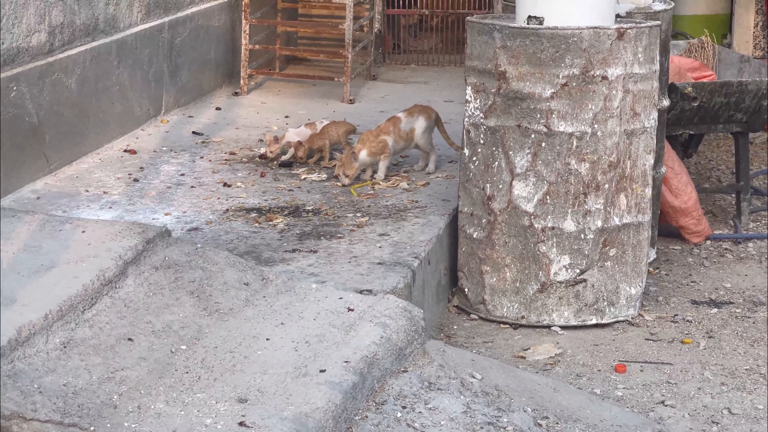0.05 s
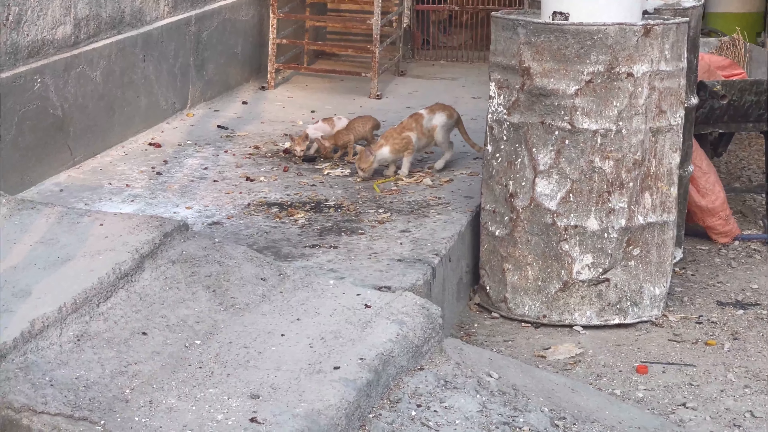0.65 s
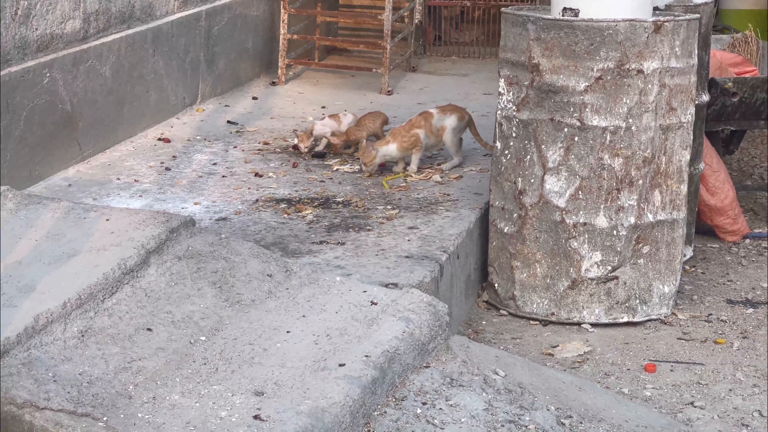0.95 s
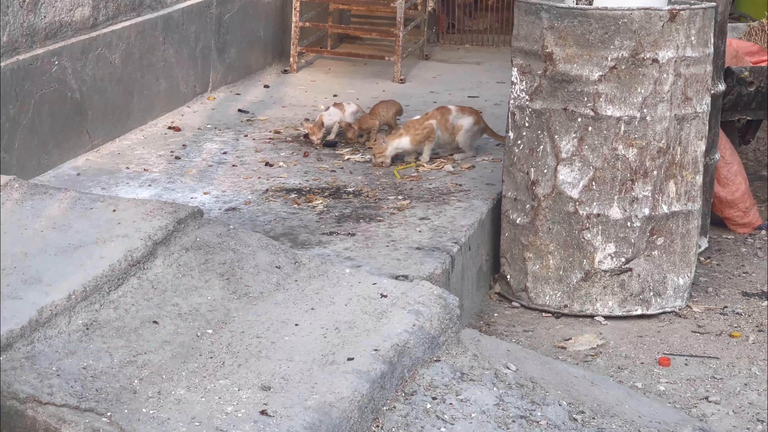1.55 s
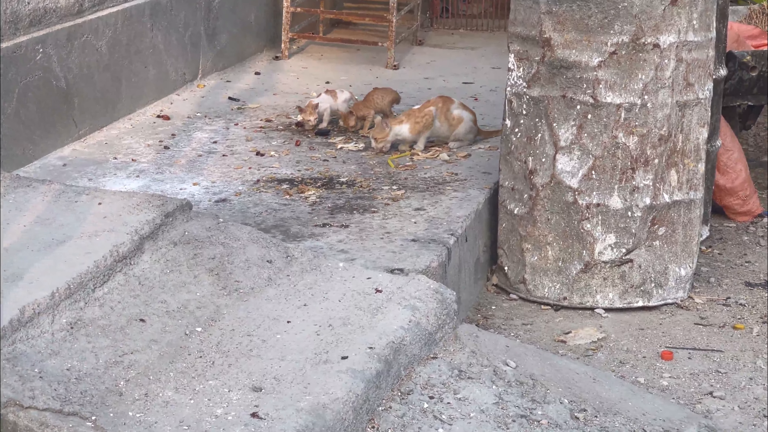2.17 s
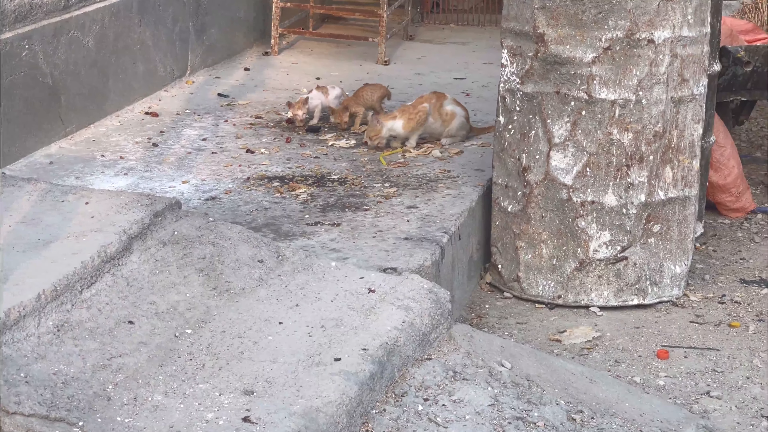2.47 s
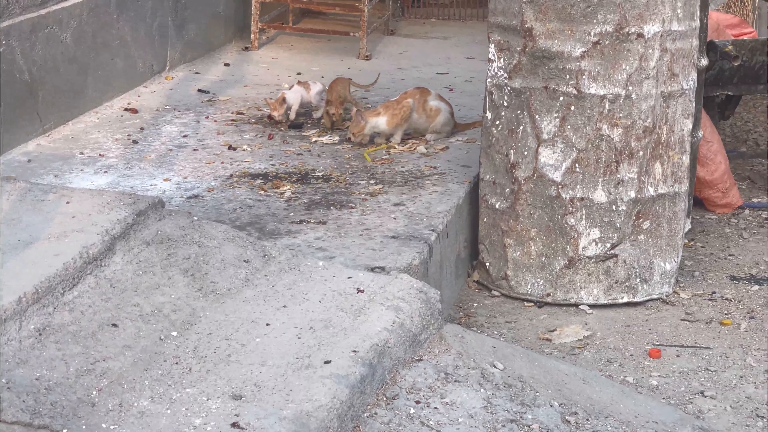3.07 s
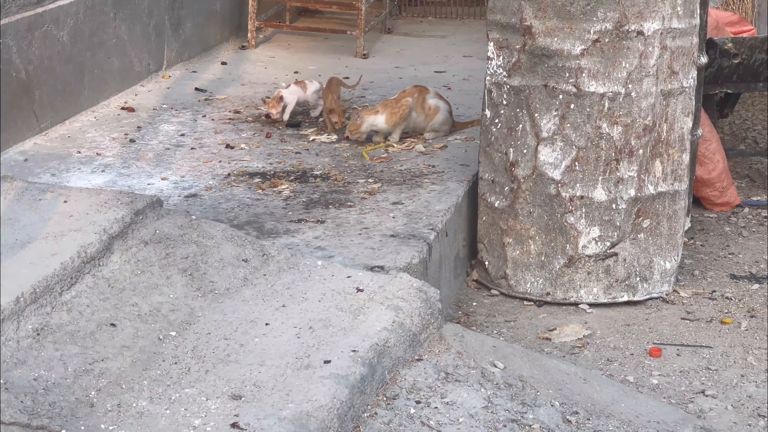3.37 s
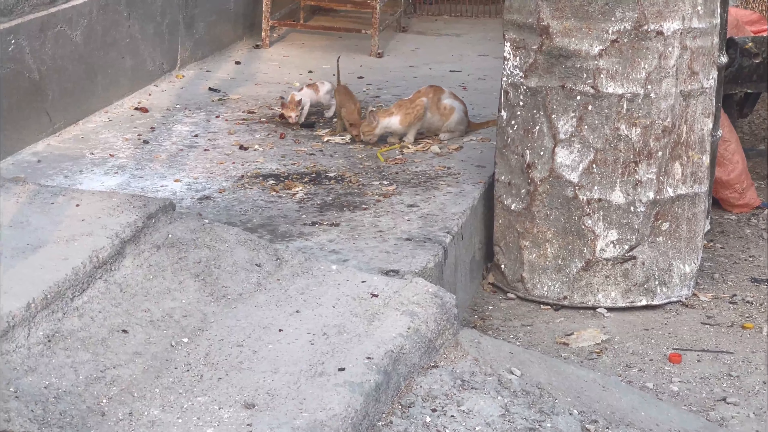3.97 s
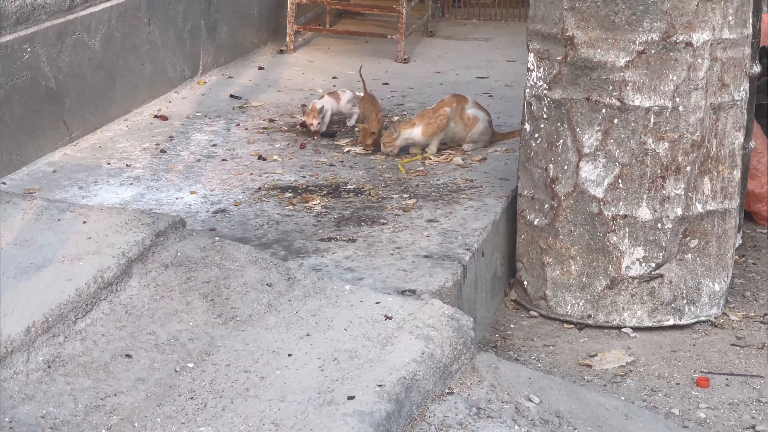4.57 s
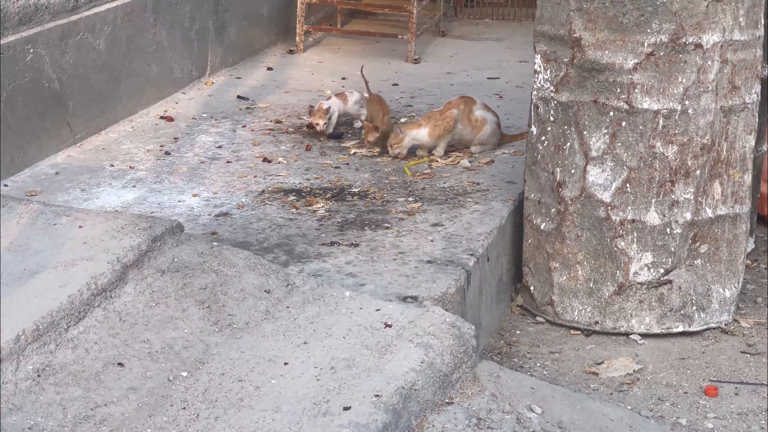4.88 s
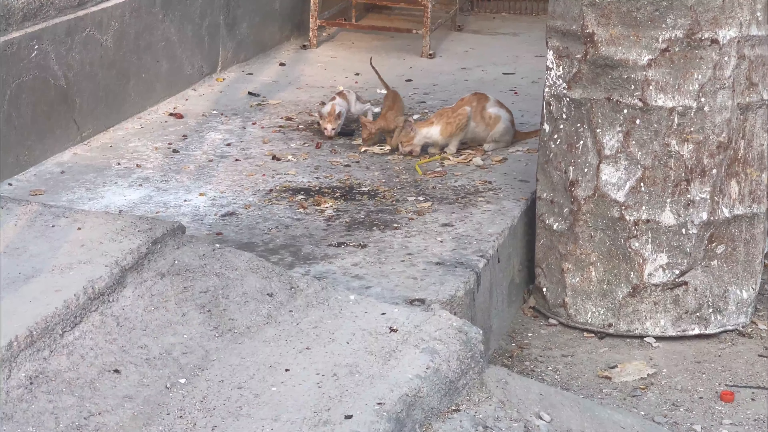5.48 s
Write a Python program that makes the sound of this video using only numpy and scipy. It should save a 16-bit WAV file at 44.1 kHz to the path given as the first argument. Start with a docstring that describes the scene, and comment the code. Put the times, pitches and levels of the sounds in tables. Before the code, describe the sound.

Cats eat scraps in a quiet walled yard, heard through a hand-held microphone. The first second holds only faint outdoor air, a far motor hum and a thin high whine; this background swells and sinks throughout, with a little hiss. At about 1.1 seconds small birds give short raspy chirps, while soft low microphone bumps and rumble run until 1.4. From 1.4 to 1.9 seconds comes the strongest burst of chewing: sharp, high, wet snaps of teeth and lips with tiny crunches, each with a brief wall echo. A bump follows at 2.4 and a shorter chewing burst around 2.8. Gliding chirps and more bumps arrive near 3.7 seconds, then another run of smacks and crunches from 3.9 to 4.2. Around 5 seconds the cats smack again, with two bumps and a brief chirp. A few faint chewing clicks trail off by 5.7 seconds.

```python
"""Cats eating in a walled yard

Three cats eat scraps off concrete: snaps of teeth and lips and runs of tiny cracks ring in their mouths, making
bursts of wet smacks and crunches, each with a brief wall echo. A far motor hums under a thin whine, and that
background swells and sinks. Small birds chirp in raspy, gliding whistles. The hand-held microphone adds soft
bumps, rumble and a little hiss."""
import sys
import numpy as np
from scipy import signal
from scipy.fft import rfft, irfft
from scipy.io import wavfile

SR = 44100
rng = np.random.default_rng(int(sys.argv[2]) if len(sys.argv) > 2 else 0)


def unload_wav(signal):
    """Save mono or channel-first audio to the path in sys.argv[1] as 16-bit WAV at rate SR, clipped to [-1, 1]."""
    wavfile.write(
        sys.argv[1],
        SR,
        np.round(np.clip(np.atleast_2d(signal).T, -1, 1) * 32767).astype(np.int16),
    )


N = 252693
TIME = np.arange(N) / SR

# Levels in the tables are relative; the mix sets the final balance.
# swells of the background: peak_s, attack_s, hold_s, level_db
BACKGROUND_SWELLS = [(0, .03, 0.047, -76.5), (0.256, 0.11, 0.015, -74), (0.509, 0.17, .02, -67.5),
                     (0.884, 0.072, 0.087, -76.5), (1.012, 0.031, 0.54, -63.5),
                     (1.807, 0.067, 0.011, -65.5), (2.432, 0.04, 0.11, -64.5), (2.818, 0.11, 0.034, -66),
                     (3.177, 0.24, 0.014, -71), (3.555, 0.062, .58, -65), (4.825, .05, .02, -76.5),
                     (4.987, 0.033, 0.21, -65), (5.69, 0.073, .02, -74)]
# the motor's tones: pitch_hz, level_db
MOTOR_TONES = [(290.7, -74.5), (382.2, -72.5), (915.2, -95), (1152, -86), (1249, -95), (1346, -79),
               (1394, -87), (1443, -78.5), (1491, -81), (1540, -80), (1588, -80.5), (1637, -90),
               (1685, -84), (1733, -83.5), (1782, -81.5), (1830, -79), (1879, -92.5), (1927, -77),
               (1970, -82), (2024, -77.5), (2067, -87), (2309, -85.5), (2740, -86), (2912, -86.5)]
# colour of the yard's air: frequency_hz, density_db
AIR_SPECTRUM = [(90, 16.5), (180, 9.5), (230, 10.5), (360, 12), (550, 3), (850, -0.5), (1200, -5.5),
                (1500, -10), (2000, -3), (2300, -8), (4700, -9), (7000, -15), (11000, -23), (15500, -44)]
# fader curve of the whine: time_s, level_db
WHINE_FADER = [(0, -17), (.17, 1), (.3, -5.5), (.42, -0.5), (.55, -15), (.7, 0.5), (.86, -8), (1.1, -14),
               (5.73, -16.5)]
# colour of the microphone's hiss: frequency_hz, density_db
HISS_SPECTRUM = [(100, 2.5), (9000, -3), (13500, 3), (16000, -4.5)]
# colour of the hand's rumble: frequency_hz, density_db
RUMBLE_SPECTRUM = [(12, -5.5), (27, 7.5), (48, 7), (72, -3.5), (130, -17), (250, -24), (600, -61),
                   (6000, -59), (15000, -78)]
# bumps on the microphone's housing: peak_s, half_length_s, boom_db, knock_vs_boom_db, rumble_db
HOUSING_BUMPS = [(0.496, .025, -65, -10, -50), (1.03, 0.022, -38, -20, -39.5),
                 (1.2, 0.038, -38.5, -16.5, -42), (1.325, 0.021, -39, -26, -36),
                 (1.387, 0.023, -43, -17, -43), (1.55, 0.027, -61, -8, -48.5), (1.69, 0.021, -61, -16, -49),
                 (2.438, 0.019, -41, -17, -44), (2.502, 0.032, -56, -6.5, -41),
                 (2.73, 0.019, -53.5, -17, -58), (2.811, 0.034, -61, -16, -47.5),
                 (3.547, 0.02, -50.5, -4.5, -60), (3.706, 0.031, -35.5, -13.5, -48.5),
                 (3.863, 0.039, -39, -14, -62), (4.038, 0.042, -41, -15.5, -60),
                 (4.994, .019, -42.5, -15.5, -62), (5.171, 0.04, -40.5, -11.5, -60),
                 (5.32, 0.044, -55, -18, -73)]
# resonances of mouth and food, one list each for the low, mid and high band: pitch_hz, width_hz, level_db
MOUTH_MODES = [
    [(3670, 420, 0), (3500, 1700, -14)],
    [(6750, 800, 0), (8000, 1400, -1), (5800, 800, -5)],
    [(9300, 1700, -1), (11000, 1800, 0), (12900, 2200, -1)],
]
# crunches of food: start_s, length_s, low_db, mid_db, high_db
FOOD_CRUNCHES = [(0.732, 0.044, -84, -75.5, -73), (1.22, 0.0081, -73, -58.5, -59),
                 (1.403, 0.028, -70, -47, -41), (1.434, 0.076, -86, -62, -72),
                 (1.508, 0.061, -81, -53.5, -60), (1.757, 0.074, -68.5, -63, -59.5),
                 (1.792, 0.018, -69, -50, -49), (1.892, 0.039, -78, -60, -62), (2.8, 0.044, -84, -63, -68),
                 (2.896, 0.051, -74, -74, -66), (3.35, 0.042, -88, -75, -75),
                 (3.466, 0.052, -87, -72.5, -80), (3.934, 0.17, -85, -68, -72),
                 (4.035, 0.15, -65.5, -61.5, -63), (4.096, 0.028, -58.5, -49.5, -52),
                 (4.192, 0.023, -59.5, -55, -59), (4.636, 0.04, -78, -75, -78),
                 (4.96, 0.084, -73, -87, -71), (5.019, 0.047, -61, -80, -65),
                 (5.417, 0.052, -69.5, -78, -75.5), (5.66, 0.042, -75, -79, -67)]
# snaps of teeth and lips: start_s, low_db, mid_db, high_db
JAW_SNAPS = [(1.3978, -74, -51, -48), (1.4405, -57, -42.5, -37), (1.4757, -61, -48, -41),
             (1.521, -58, -43.5, -46.5), (1.54, -64, -46, -67), (1.569, -74, -34, -51),
             (1.6722, -75, -63, -48), (1.6895, -83, -58, -45.5), (1.744, -68.5, -54.5, -38.5),
             (1.7733, -74, -55, -53), (1.8011, -50, -33, -59), (1.816, -52, -60, -47),
             (1.8986, -65, -51, -48), (1.9145, -65, -48, -48), (2.3395, -85, -60.5, -70),
             (2.7907, -59.5, -49, -46.5), (2.8254, -72, -46.5, -41.5), (2.8452, -71, -50, -53),
             (2.9185, -73, -56, -48), (3.4682, -74, -57.5, -63), (3.9432, -61, -58, -61),
             (3.9863, -54.5, -50, -63), (4.012, -65, -47.5, -53), (4.057, -68, -46, -49),
             (4.0655, -57, -42, -48), (4.0975, -56, -49, -45), (4.1086, -48, -58, -57),
             (4.1393, -53, -56, -57), (4.168, -51, -51, -65), (4.2071, -48, -42, -45.5),
             (4.455, -66, -73, -85), (4.65, -67, -76, -65.5), (4.9897, -59, -72, -58.5),
             (5.0295, -40.5, -63, -55.5), (5.0463, -40, -56, -61), (5.063, -61, -53.5, -52),
             (5.188, -62, -60, -62), (5.4261, -62, -65, -81), (5.6673, -77.5, -66, -55.5)]
# soft rubs and faint far noises: start_s, length_s, centre_hz, width_hz, level_db
SOFT_RUBS = [(1.025, 0.18, 5200, 3150, -62.5), (1.064, 0.27, 9200, 4500, -77.5),
             (1.158, .14, 586, 250, -69), (1.798, 0.04, 3060, 1400, -62.5), (1.817, 0.079, 240, 178, -61.5),
             (1.917, 0.083, 347, 111, -61), (2.777, 0.1, 2800, 1500, -65.5), (2.921, 0.14, 2050, 130, -69),
             (3.121, 0.1, 1950, 119, -73), (3.517, 0.091, 1985, 160, -67), (3.71, 0.07, 2290, 250, -65.5),
             (3.658, 0.14, 9000, 4000, -80), (3.942, 0.17, 2460, 700, -70.5), (4.014, .13, 725, 414, -64.5),
             (4.074, 0.082, 884, 90, -69), (5.22, 0.2, 5400, 2500, -79)]
# bird chirps: start_s, length_s, start_hz, end_hz, level_db, rasp_share_of_pitch
BIRD_CHIRPS = [(1.057, 0.0208, 3037, 3150, -50, 0.042), (1.094, 0.035, 4670, 3830, -51, .11),
               (1.169, 0.037, 6720, 6420, -56, 0.04), (1.172, 0.0255, 3973, 4110, -50, .09),
               (3.184, 0.032, 5510, 4740, -64.5, 0.12), (3.664, 0.05, 4770, 5810, -57.5, 0.1),
               (3.671, 0.053, 3103, 3083, -58, 0.046), (3.825, .025, 3007, 2980, -60.5, 0.072),
               (3.725, .056, 4665, 5360, -50, 0.13), (3.803, 0.044, 3840, 4620, -57, 0.176),
               (3.815, 0.039, 6650, 5800, -55.5, 0.072), (5.172, 0.02, 6600, 6440, -55.5, 0.073),
               (5.182, 0.0053, 6290, 6350, -49.5, 0.021)]

SNAP_DECAY_S = 0.00064


def from_db(db):
    return 10 ** (np.asarray(db) / 20)


def unit_rms(x):
    return x / np.sqrt(np.mean(x ** 2) + 1e-20)


def add(track, start_s, sound):
    """Drop a sound onto a track."""
    start = max(0, int(start_s * SR))
    part = track[start:start + len(sound)]
    part += sound[:len(part)]


def drift(rate_hz):
    """A smooth random wobble, moving at up to about rate_hz; rms 1."""
    hz = np.fft.rfftfreq(N, 1 / SR)
    return unit_rms(irfft(rfft(rng.standard_normal(N)) / (1 + (hz / rate_hz) ** 4), N))


def coloured_noise(spectrum):
    """Noise shaped by an EQ curve; rms 1."""
    points, hz = np.array(spectrum), np.fft.rfftfreq(N, 1 / SR)
    gain = from_db(np.interp(np.log(hz + 1), np.log(points[:, 0]), points[:, 1]))
    return unit_rms(irfft(rfft(rng.standard_normal(N)) * gain, N))


def noise_band(hz, width_hz, count=N):
    """Noise through one steep-sided resonance; rms about 1."""
    edges = np.clip([hz - width_hz / 2, hz + width_hz / 2], 10, .45 * SR)
    bandpass = signal.butter(2, edges, "band", fs=SR, output="sos")
    return signal.sosfilt(bandpass, rng.standard_normal(count)) * np.sqrt(SR / 2 / width_hz)


def background_swell(sink_db_per_s):
    """The background's gain ride: each swell rises, holds and sinks, and the loudest one wins."""
    levels = []
    for peak_s, attack_s, hold_s, db in BACKGROUND_SWELLS:
        rise = np.clip(1 + (TIME - peak_s) / attack_s, 1e-6, 1)
        sunk_db = sink_db_per_s * np.maximum(TIME - peak_s - hold_s, 0)
        levels.append(db + 20 * np.log10(rise) - sunk_db)
    return from_db(np.max(levels, axis=0))


def far_motor(turn_hz, tones_db, drone_db, rattle_db, waver):
    """A motor hums: wavering tones, a drone at twice the turning rate and a rattle on every turn."""
    clock = TIME + np.cumsum(0.00072 * drift(2.8)) / SR  # the speed wanders slightly
    tones, flicker = np.zeros(N), drift(19.0)
    for hz, db in MOTOR_TONES:
        wobble = 1 + waver * np.roll(flicker, rng.integers(N))
        tones += from_db(db) * wobble * np.sin(2 * np.pi * (hz * clock + rng.random()))
    turn = 2 * np.pi * turn_hz * clock
    drone = (1 + waver * flicker) * np.sin(2 * turn)
    rattle = unit_rms((1 + np.cos(turn)) ** 3 * noise_band(hz=1703, width_hz=830))
    return from_db(tones_db) * unit_rms(tones) + from_db(drone_db) * drone + from_db(rattle_db) * rattle


def far_whine():
    """A thin whine of narrow-band noise, strongest in the first second."""
    fader_db = np.interp(TIME, *np.transpose(WHINE_FADER))
    return from_db(fader_db) * noise_band(hz=4538, width_hz=140)


def handling(swell, boom_hz, bump_gain_db, rumble_gain_db, resting_db):
    """Each bump booms at the housing's low resonance, with a dull knock on top and a lift in rumble."""
    bumps, knock = np.zeros(N), noise_band(hz=177.7, width_hz=48.5)
    rumble_power = (swell * from_db(resting_db)) ** 2
    for peak_s, half_length_s, boom_db, knock_db, rumble_db in HOUSING_BUMPS:
        envelope = np.exp(-.5 * ((TIME - peak_s) / half_length_s) ** 2)
        boom = np.sqrt(2) * np.cos(2 * np.pi * boom_hz * (TIME - peak_s))
        bumps += from_db(boom_db + bump_gain_db) * envelope * (boom + from_db(knock_db) * knock)
        rumble_power += (from_db(rumble_db + rumble_gain_db) * envelope) ** 2
    return bumps + np.sqrt(rumble_power) * coloured_noise(RUMBLE_SPECTRUM)


def mouth_ring(modes, detune, vary_db):
    """The mouth's ring in one bite: its shape retunes the resonances together and rebalances them."""
    age, ring = TIME[:256], 0
    tuning = np.exp(detune * np.clip(rng.standard_normal(), -1, 1))
    for hz, width_hz, db in modes:
        # soft tissue lets each resonance bloom briefly before it dies
        envelope = age ** 3 * np.exp(-2.3 * np.pi * width_hz * age)
        mode = envelope / envelope.max() * np.cos(2 * np.pi * (hz * tuning * age + rng.random()))
        ring += from_db(db + vary_db * rng.standard_normal()) * unit_rms(mode)
    return ring / np.linalg.norm(ring)


def snap(ring, decay_s, count):
    """One wet click: a few milliseconds of noise set the mouth ringing; rms 1."""
    age = TIME[:count]
    burst = rng.standard_normal(count) * age * np.exp(-age / decay_s)
    return unit_rms(np.convolve(burst, ring))


def tongue_ticks(per_s, level_db, spread_db):
    """Tongues and crumbs tick faintly at random, in the mouth's upper resonances."""
    out = np.zeros(N)
    starts = np.cumsum(rng.exponential(1 / per_s, size=40))
    for start_s, db in zip(starts, rng.normal(level_db, spread_db, size=40)):
        ring = mouth_ring(MOUTH_MODES[1] + MOUTH_MODES[2], detune=.03, vary_db=4.5)
        add(out, start_s, from_db(db) * snap(ring, SNAP_DECAY_S, count=256))
    return out


def fractures(length_s, per_s, fizz):
    """Food breaks in a run of tiny, uneven cracks over a fine fizz; rms 1."""
    count = int(length_s * SR)
    cracks = rng.random(count) < per_s / SR
    return unit_rms((cracks + fizz) * rng.standard_normal(count) * signal.windows.tukey(count, .45))


def chewing(snap_db, crunch_db, firm_bite_db):
    """Snaps and crunches ring the mouth's three bands, each bite with its own blend."""
    out = np.zeros(N)
    for band, modes in enumerate(MOUTH_MODES):
        for start_s, *levels in JAW_SNAPS:
            softness_db = max(firm_bite_db - max(levels), 0)
            decay_s = SNAP_DECAY_S * (1 + 0.02 * softness_db)  # gentler bites are slower
            ring = mouth_ring(modes, detune=0.0085, vary_db=4.0)
            for delay_s, db in ((0, 0), (0.0036, -8.5)):  # the jaw closes with a second, weaker snap
                click = snap(ring, decay_s, count=768)
                add(out, start_s + delay_s, from_db(levels[band] + snap_db + db) * click)
        for start_s, length_s, *levels in FOOD_CRUNCHES:
            cracks = fractures(length_s, per_s=860, fizz=0.29)
            ring = mouth_ring(modes, detune=0.014, vary_db=5.0)
            add(out, start_s, from_db(levels[band] + crunch_db) * np.convolve(cracks, ring))
    return out


def yard_echo(sound, t60_s, lowpass_hz):
    """The yard's hard surfaces scatter back a short, slightly darker tail."""
    age = TIME[:SR // 2]
    tail = rng.standard_normal(len(age)) * from_db(-60 * age / t60_s) * (1 - np.exp(-age / 0.0035))
    lowpass = signal.butter(1, lowpass_hz, fs=SR, output="sos")
    return signal.fftconvolve(sound, signal.sosfilt(lowpass, tail / np.linalg.norm(tail)))[:N]


def rubs():
    """Soft rubs and faint far noises: each is one band of noise, faded in and out."""
    out = np.zeros(N)
    for start_s, length_s, hz, width_hz, db in SOFT_RUBS:
        count = int(length_s * SR)
        noise = unit_rms(noise_band(hz, width_hz, 2 * count)[count:])  # let the resonance settle first
        add(out, start_s, from_db(db) * noise * signal.windows.tukey(count, .6))
    return out


def birds(flutter_hz):
    """Short gliding whistles with one overtone; a fast pitch flutter gives them their rasp."""
    out, flutter = np.zeros(N), drift(flutter_hz)
    for start_s, length_s, start_hz, end_hz, db, rasp in BIRD_CHIRPS:
        count, start = int(length_s * SR), int(start_s * SR)
        hz = np.linspace(start_hz, end_hz, count) * (1 + rasp * flutter[start:start + count])
        phase = 2 * np.pi * np.cumsum(hz) / SR
        overtone_db = -56 * np.log2(start_hz / 3100)  # the beak favours the overtone of low notes
        whistle = np.sin(phase) + from_db(overtone_db) * np.sin(2 * phase)
        add(out, start_s, from_db(db) * whistle * signal.windows.tukey(count, .45))
    return out


def scene():
    """The mono mix: cats up close, birds set back in their echoes, a swelling bed underneath."""
    swell = background_swell(sink_db_per_s=29)
    cats = chewing(snap_db=-14.0, crunch_db=-3.5, firm_bite_db=-49)
    chirps = birds(flutter_hz=1220)
    ground_scatter = from_db(-11.5) * yard_echo(cats, t60_s=0.12, lowpass_hz=15000)
    wall_echo = from_db(-10) * yard_echo(cats, t60_s=0.21, lowpass_hz=12000)
    far_birds = from_db(-2.0) * chirps + from_db(0.5) * yard_echo(chirps, t60_s=0.16, lowpass_hz=8600)
    whine = far_whine()
    motor = far_motor(turn_hz=48.54, tones_db=1.24, drone_db=10.5, rattle_db=-6.5, waver=0.3)
    air = from_db(7.0) * coloured_noise(AIR_SPECTRUM)
    hiss = from_db(-90.0) * coloured_noise(HISS_SPECTRUM)
    hand = handling(swell, boom_hz=98.5, bump_gain_db=-2, rumble_gain_db=-1.5, resting_db=7.5)
    bed = swell * (whine + motor + air) + hiss + hand + rubs()
    ticks = tongue_ticks(per_s=2.5, level_db=-84, spread_db=1.5)
    return (cats + ground_scatter + wall_echo + ticks + far_birds + bed)[None]


def record(dry):
    """The microphone rolls off the highest treble, and a steep filter cuts the very top."""
    rolloff = signal.butter(3, 14600, fs=SR, output="sos")
    high_cut = signal.ellip(10, .1, 70, 15650, fs=SR, output="sos")
    return signal.sosfilt(high_cut, signal.sosfilt(rolloff, dry))


dry = scene()
out = record(dry)
unload_wav(out)
```